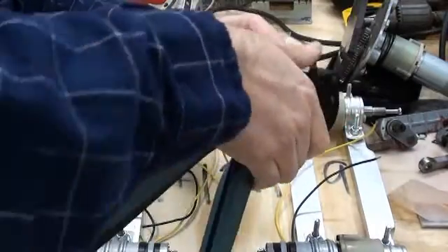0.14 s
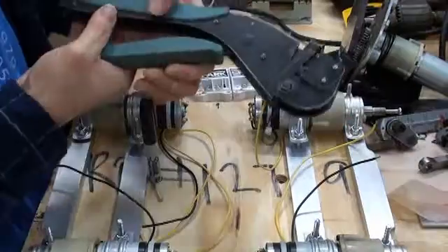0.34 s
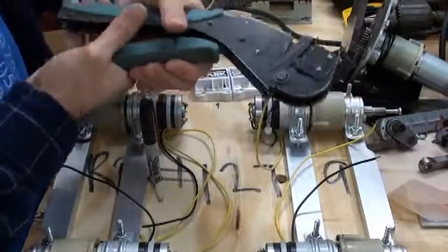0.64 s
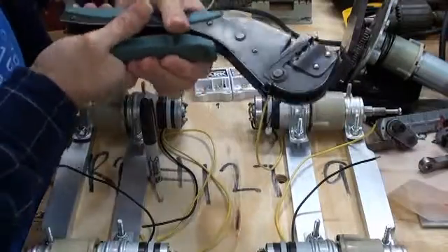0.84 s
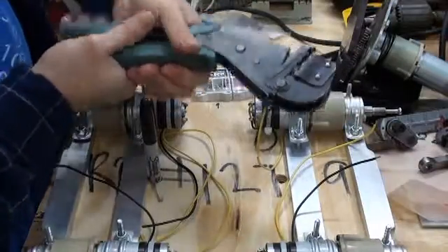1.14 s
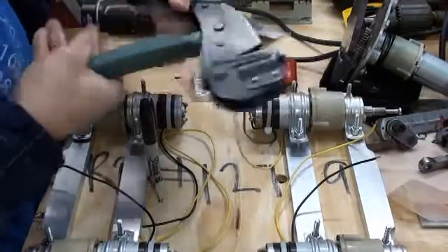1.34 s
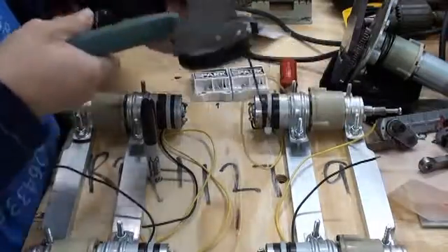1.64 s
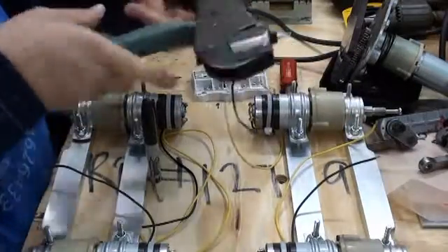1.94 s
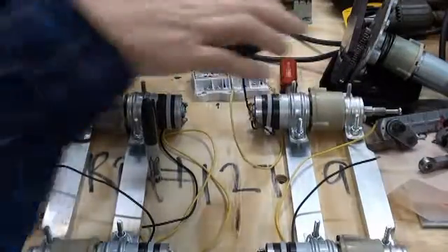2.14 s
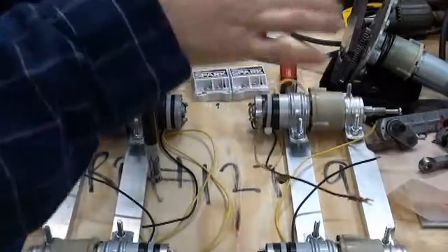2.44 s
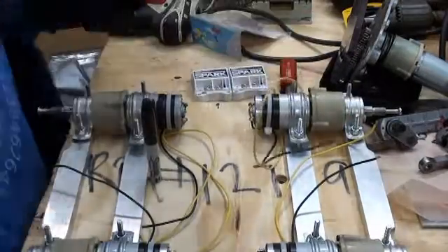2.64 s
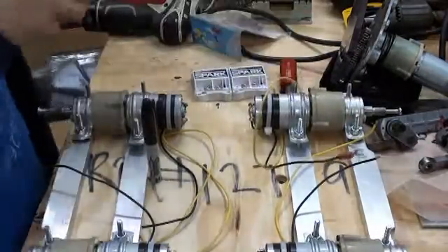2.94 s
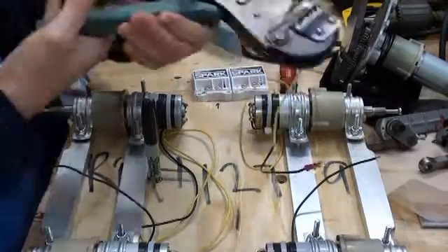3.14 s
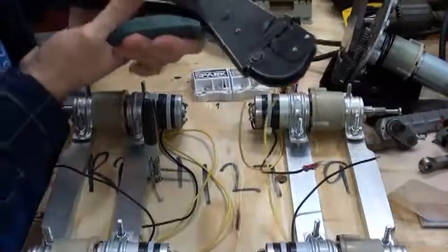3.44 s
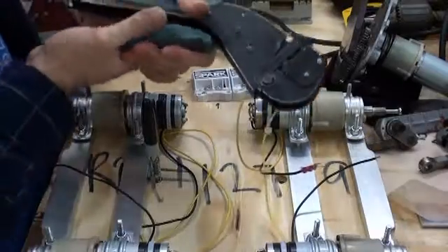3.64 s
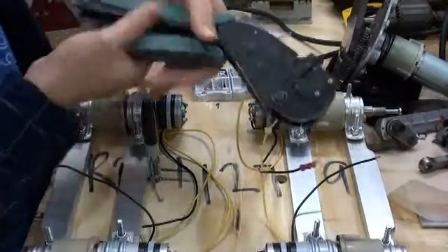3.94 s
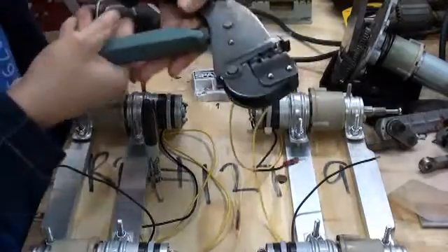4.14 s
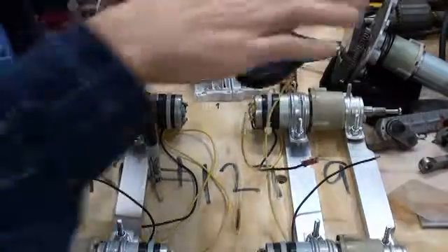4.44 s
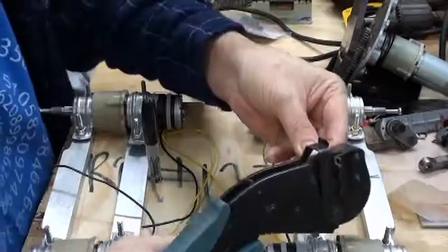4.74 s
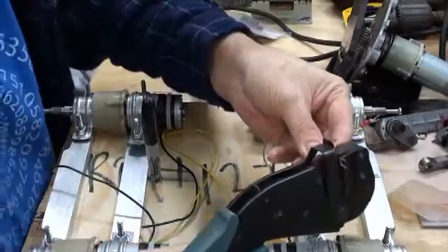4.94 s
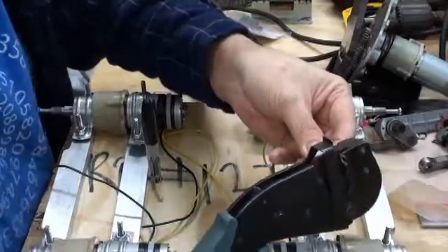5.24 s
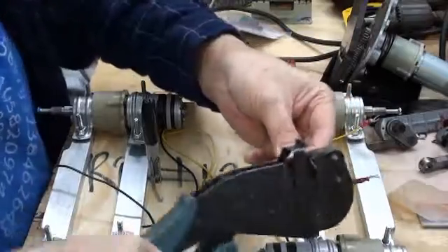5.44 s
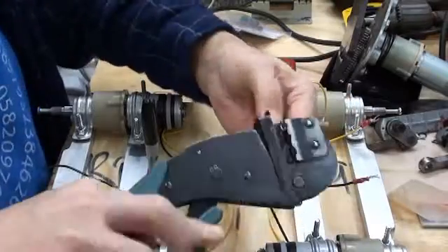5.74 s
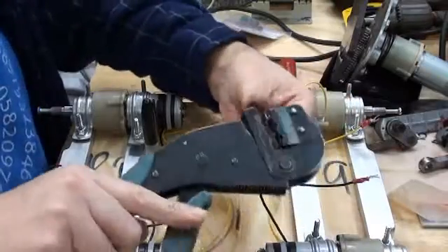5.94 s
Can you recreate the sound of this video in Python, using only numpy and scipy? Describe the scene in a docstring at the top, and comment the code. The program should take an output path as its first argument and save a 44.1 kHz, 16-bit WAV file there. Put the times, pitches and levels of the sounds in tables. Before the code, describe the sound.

A steel ratcheting crimping tool is handled over a wooden workbench, ticking and clacking in short, irregular clusters. Loose metal parts clink and rattle, with a few light knocks on the wood. More ratchet clicks follow, then a loud rattle and several hard knocks on the bench near the end. The sounds are close, in a small workshop, over soft sleeve rustle, a low rumble and faint hum.

```python
"""A ratcheting crimping tool, worked by hand over a wooden bench in a workshop.
The pawl ticks over steel teeth; the jaws clack and ring. Knocks and scuffs excite the bench top,
and loose parts rattle. Sleeves rustle over a low rumble, a far engine and mains hum.
The level dips briefly twice; a short high pip sounds as it returns the second time."""
import sys
import numpy as np
from scipy import signal
from scipy.fft import rfft, irfft
from scipy.io import wavfile
from scipy.ndimage import uniform_filter1d

SR = 44100
rng = np.random.default_rng(int(sys.argv[2]) if len(sys.argv) > 2 else 0)


def transcribe(signal):
    """Save signal, clipped to [-1, 1], as a 16-bit WAV file at the path in sys.argv[1]."""
    frames = np.atleast_2d(signal).T
    limited = np.clip(frames, -1, 1)
    pcm = np.round(limited * 32767).astype(np.int16)
    wavfile.write(sys.argv[1], SR, pcm)


N = 269342
T = np.arange(N) / SR

# Steel modes: pitch_hz, gain_db, t60_s
STEEL_MODES = [(1530, 2.5, 0.039), (3137, 6, 0.02), (3400, 5, 0.024), (4560, 6.5, 0.027),
               (5140, 8.5, 0.022), (6260, 10.5, 0.017), (7100, 11, 0.011), (7740, 11, 0.014),
               (8870, 3, 0.022)]
# Pawl drops: start_s, level_db, ping_hz
PAWL_TICKS = [(0.96, -25, 3206), (1.0799, -31.5, 5360), (1.1176, -27.5, 6580), (3.8118, -24.5, 3370),
              (3.915, -27, 4440), (3.9475, -22.5, 4370), (4.931, -18, 3030), (5.008, -20.5, 6500),
              (5.1602, -26, 3040), (5.2077, -21, 6600)]
# Ratchet releases: start_s, level_db, body_db, edge_db
RELEASE_CLACKS = [(1.194, -14, -1.5, -1.5), (4.014, -14, -1, -5.5)]
# Clinks and one pip: start_s, level_db, body_db, edge_db, room_db, ping_hz
# The row at 3.249 s is the short high pip as the sound returns after the second level dip.
CLINKS_AND_PIP = [(0.2188, -35, -28, -4.5, -4.5, 3020), (1.4141, -33, -9.5, 2, 4, 3960),
                  (1.493, -24.5, -30, 2, -1, 3470), (1.5627, -15, -16.5, 1, -11, 5300),
                  (1.565, -25.5, -28, 9, 6.5, 7930), (1.579, -26, -11, -3, -21, 7700),
                  (1.6029, -21, -17, -3, 0, 7950), (1.7833, -21, -22, -9, -4, 4380),
                  (1.815, -19, -16, 6, -4.5, 7800), (1.858, -27, -7, -12, -2.5, 4500),
                  (2.4455, -33.5, -10, 1, 2, 5200), (2.4577, -30, -28, 4, -10, 5260),
                  (2.7306, -25, -13, 5, -4, 5110), (2.9595, -28.5, -23, -0.5, -0.5, 7280),
                  (2.9663, -25.5, -18, 5, -4, 7200), (3.046, -40, -6, 8, 5, 6600),
                  (3.1881, -31.5, -30, 14, -4, 8850), (3.2028, -37.5, -8, 17, -7, 8500),
                  (3.232, -39.5, -15, 19.5, -28, 9100), (3.249, -43, -20, 1, -19, 7200),
                  (4.159, -27.5, -16, -10, -6.5, 4750), (4.1908, -35.5, -27, -2, -4, 4000),
                  (4.211, -37, -20, 3.5, 0.5, 7000), (4.2698, -25.5, -22, -4.5, -3, 4560),
                  (4.914, -40.5, -17, -3, 2, 5260), (5.32, -28, 6, -8, 8, 6360),
                  (5.66, -34.5, -28, -0.5, -12, 7680)]


def crimping_tool():
    """Each tick is a three-band crack plus a ping. Returns direct sound, room feed."""
    cracks, rings = np.zeros((2, 3, N)), np.zeros((2, N))
    t = np.arange(4096) / SR
    snap_t60_s, clink_t60_s = .0075, .015
    pawl_body_db, pawl_edge_db, pawl_room_db = -25, 7.5, -6.5
    release_room_db, release_ping_hz = -3.5, 1430
    ticks = [(start_s, db, pawl_body_db, pawl_edge_db, pawl_room_db, ping_hz, snap_t60_s)
             for start_s, db, ping_hz in PAWL_TICKS]
    ticks += [(*row, release_room_db, release_ping_hz, snap_t60_s) for row in RELEASE_CLACKS]
    ticks += [(*row, clink_t60_s) for row in CLINKS_AND_PIP]
    for start_s, db, body_db, edge_db, room_db, ping_hz, t60_s in ticks:
        attack = 1 - np.exp(-t / (.1 * t60_s))
        crack = attack * 10 ** (-3 * t / t60_s) * rng.standard_normal(len(t))
        ping = steel_ping(t, body_db, edge_db, ping_hz)
        impulse = np.array([np.sqrt(np.sum(crack ** 2))])  # same energy, for the room
        for path, (path_db, pulse) in enumerate(((0, crack), (room_db, impulse))):
            add(rings[path], start_s, undb(db + path_db) * ping)
            for register, register_db in enumerate((body_db, 0, edge_db)):
                add(cracks[path, register], start_s, undb(db + register_db + path_db) * pulse)
    body = undb(23.5) * band(band(cracks[:, 0], 1380, 2500), 1300, 3000)
    middle = undb(17) * band(band(cracks[:, 1], 3100, 6800), 3000, 9000)
    edge = undb(13) * band(cracks[:, 2], 6200, 11600)
    return body + middle + edge + undb([[-14], [-21]]) * rings


def steel_ping(t, body_db, edge_db, ping_hz):
    """Gripped steel damps fast. Contact point varies the mode levels; grip shifts their pitch."""
    mode_hz, mode_db, t60_s = np.transpose(STEEL_MODES)[:, :, None]
    share, shift = rng.standard_normal((2, len(STEEL_MODES), 1))
    register_db = np.interp(mode_hz, [1500, 3000, 5500, 7000], [body_db, 0, 0, edge_db])
    distance_hz = np.abs(mode_hz - ping_hz)
    nearest = distance_hz == distance_hz.min()
    pitch_hz = np.where(nearest, ping_hz, mode_hz * (1 + .02 * shift))
    level_db = mode_db + register_db + 7.5 * nearest + 3 * share
    modes = undb(level_db - 60 * t / t60_s) * np.sin(2 * np.pi * pitch_hz * t)
    attack = 1 - np.exp(-t / .0007)
    return attack * modes.sum(axis=0)


# Bench-top modes: pitch_hz, gain_db, t60_s
BENCH_MODES = [(234, -9, 0.28), (318, -15.5, 0.11), (275.6, -11.5, 0.18), (358.7, -3, 0.14),
               (418, 4, 0.035), (506, 2.5, 0.065), (606, 7, 0.042), (661, 1.5, 0.059), (719, 5.5, 0.03),
               (1025, 13, 0.014), (2250, -5.5, 0.037)]
# Knocks: start_s, level_db, contact_ms, ring_hz
BENCH_KNOCKS = [(0.003, -20.5, 2.7, 245), (0.265, -32.5, 0.11, 2250), (0.298, -22.5, 4.8, 234),
                (1.193, -31, 0.91, 402), (1.8161, -32.5, 1.04, 397), (1.831, -22.5, 2.27, 224),
                (1.88, -25, 2.5, 393), (1.946, -33.5, 1.2, 600), (1.981, -30.5, 2, 704),
                (4.013, -35, 0.57, 503), (4.2114, -25, 1.02, 230), (4.222, -35.5, 0.57, 740),
                (5.3082, -11.5, 1.08, 500), (5.333, -6.5, 1.7, 278), (5.348, -18.5, 1.05, 660),
                (5.38, -15, 1.17, 353), (5.555, -19, 2.65, 310), (5.606, -2, 2.19, 308),
                (5.631, -23, 0.89, 360), (5.661, -21, 2.9, 227)]


def bench_knocks():
    """A short push rings the board; longer contact is duller. The small board radiates no deep bass."""
    board = np.zeros(N)
    lag_s = .001566
    for start_s, db, contact_ms, ring_hz in BENCH_KNOCKS:
        pulse = np.hanning(max(int(contact_ms * SR / 1000), 3) + 2)
        push = np.pad(-undb(db) * pulse / pulse.sum(), (0, SR // 4))
        for hz, mode_db, t60_s in BENCH_MODES:
            share, shift = rng.standard_normal(2)  # contact point and load vary
            lift_db = 10.7 * np.exp(-(np.log2(hz / ring_hz) / .11) ** 2)
            mode = ring(push, hz * (1 + .017 * shift), t60_s)
            add(board, start_s + lag_s, undb(mode_db + 2 * share + lift_db) * mode)
    return undb(-9) * band(board, 200, 3000)


# Scuffs: peak_s, level_db, rise_s, t60_s
BENCH_SCUFFS = [(0.002, -33, 0.0022, 0.34), (1.85, -48.5, 0.065, 0.39), (4.89, -43.5, 0.032, 0.47),
                (5.33, -25, 0.023, 0.32)]


def bench_scuffs():
    """Dragged or rocking objects drive the board's modes with a rough force."""
    force = rng.standard_normal(N) * undb(5 * walk(120))
    drag = unit(sum(undb(db) * ring(force, hz, t60_s) for hz, db, t60_s in BENCH_MODES))
    return drag * sum(burst(*row) for row in BENCH_SCUFFS)


# Jolt: start_s, level_db, pitch_hz, t60_s
BENCH_JOLT = (5.318, -33, 68, .25)


def bench_thump():
    """The whole bench jolts in one low, decaying mode."""
    start_s, db, hz, t60_s = BENCH_JOLT
    age_s = np.maximum(T - start_s, 0)
    return undb(db - 60 * age_s / t60_s) * np.sin(2 * np.pi * hz * age_s)


# Rattles: peak_s, level_db, rise_s, t60_s, bright_share, ring_share, ring_hz
RATTLES = [(0.002, -31, 0.0081, 0.11, 0.17, 0, 3100), (1.43, -42.5, 0.092, 0.051, 0.72, 0.1, 4370),
           (1.571, -33, 0.022, 0.46, 1, 0.94, 7340), (1.572, -31, 0.01, 0.29, 0.92, 0.6, 3450),
           (1.83, -35.5, 0.068, 0.66, 0.72, 0, 5230), (2.735, -31, 0.02, 0.11, 0.95, 0.58, 5350),
           (3.2, -39.5, 0.059, 0.12, 1, 0.2, 8400), (5.355, -12.5, 0.045, 0.1, 0.53, 0.08, 7060)]


def loose_parts():
    """Bursts of dense, uneven contacts. Ungripped steel rings longer."""
    t60_ratio = 1.8
    grains = rng.standard_normal(N) * undb(4 * walk(340) + 1.2 * walk(60))
    dull, bright = unit(band(grains, 780, 4200)), unit(band(grains, 1900, 7720))
    mode_hz, mode_db, _ = np.transpose(STEEL_MODES[1:])
    modes = np.array([ring(grains, hz, t60_ratio * t60_s) for hz, _, t60_s in STEEL_MODES[1:]])
    out = np.zeros(N)
    for peak_s, db, rise_s, t60_s, bright_share, ring_share, ring_hz in RATTLES:
        lift_db = 12 * np.exp(-(np.log2(mode_hz / ring_hz) / .1) ** 2)
        ringing = unit(undb(mode_db + lift_db) @ modes)
        treble = (1 - ring_share) * bright + ring_share * ringing
        out += burst(peak_s, db, rise_s, t60_s) * ((1 - bright_share) * dull + bright_share * treble)
    return out


# Hand and sleeve activity: time_s, level_db
SLEEVE_LEVELS = [(0, -50), (.3, -53.5), (.55, -49.5), (.9, -55), (1.35, -57.5), (2, -51.5), (2.6, -49),
                 (2.9, -54.5), (3.25, -48), (3.45, -43), (3.75, -54), (4.35, -50), (4.56, -48.5),
                 (4.62, -56), (4.9, -62), (5.55, -47), (5.8, -45.5), (6.11, -49)]
# Rustle spectrum: freq_hz, density_db
SLEEVE_SPECTRUM = [(2500, -1), (3500, -1), (5000, 2.5), (7500, 2.5), (10000, -6), (13000, -14)]


def sleeves():
    """Cloth rustles as the hands move. Returns the rustle and its level contour in dB."""
    level_db = np.interp(T, *np.transpose(SLEEVE_LEVELS))
    return undb(level_db + 1.6 * walk(25)) * coloured(SLEEVE_SPECTRUM), level_db


# Scrape contour: time_s, level_db
SCRAPE_LEVELS = [(3.1, -61.5), (3.26, -48.5), (3.6, -51), (3.85, -66), (4.5, -53), (4.65, -90),
                 (5.5, -49.5), (5.75, -47.5), (6.11, -50)]
# Scrape spectrum: freq_hz, density_db
SCRAPE_SPECTRUM = [(1300, -12), (1700, 3), (2300, -2.5), (2620, 6), (2900, -2.5)]


def cloth_scrape():
    """Cloth rubs on the bench: thin, uneven noise."""
    level_db = np.interp(T, *np.transpose(SCRAPE_LEVELS))
    return undb(level_db + 1.5 * walk(15)) * coloured(SCRAPE_SPECTRUM)


# Broad noise, rumble and deep rumble spectra: freq_hz, density_db
BROAD_SPECTRUM = [(150, 5.5), (250, 2.5), (600, 3), (1000, 0), (2000, -3.5), (4000, -19), (8000, -15),
                  (13000, -20.5)]
RUMBLE_SPECTRUM = [(70, -32), (115, 5.5), (170, 3.5), (250, -19)]
DEEP_SPECTRUM = [(30, -6), (56, -1), (72, -6), (110, 5)]


def background_noise(sleeve_db):
    """Broad noise and rumble swell with the sleeves over a steady deep rumble. Returns mid, side."""
    swell_db = .26 * (sleeve_db + 50)
    broad_gain = undb(-48 + swell_db + 1.2 * walk(14))
    rumble = undb(-55.5 + swell_db) * coloured(RUMBLE_SPECTRUM)
    deep = undb(-58) * coloured(DEEP_SPECTRUM)
    return broad_gain * coloured(BROAD_SPECTRUM) + rumble + deep, broad_gain * coloured(BROAD_SPECTRUM)


# Engine drone: time_s, pitch_hz, low_partial_db, middle_partial_db, high_partial_db
ENGINE_TRACK = [(0.35, 68, -46, -68, -68), (0.5, 67.94, -59, -55, -55), (0.87, 61.2, -60, -69, -56),
                (1.45, 57.4, -63, -66, -50.5), (1.65, 53.3, -59, -66, -58), (1.99, 54.9, -47, -62, -62),
                (2.42, 57.07, -59, -91, -51), (2.82, 63.8, -53, -50, -62.5), (3.24, 65.8, -52, -50.5, -63)]


def far_engine():
    """A distant engine drones in three gliding partials, each wavering in level."""
    time_s, pitch_hz, *partials_db = np.transpose(ENGINE_TRACK)
    phase = 2 * np.pi * np.cumsum(np.interp(T, time_s, pitch_hz)) / SR
    fade = np.clip(np.minimum(T - time_s[0], time_s[-1] - T) / .02, 0, 1)
    out = np.zeros(N)
    for ratio, db in zip((1, 1.5, 2.5), partials_db):
        out += undb(np.interp(T, time_s, db) + 2.9 * walk(8.74)) * np.sin(ratio * phase)
    return np.sqrt(2) * fade * out


def mains_hum(pitch_hz=117, rms_db=-58.5):
    """One sine of steady pitch and wavering level."""
    return np.sqrt(2) * undb(rms_db + 2.7 * walk(6.06)) * np.sin(2 * np.pi * pitch_hz * T)


def room(x, delay_s=.008, t60_s=.33):
    """Wall reflections: a gap, then a diffuse tail. Treble dies sooner."""
    t = np.arange(int(.5 * SR)) / SR
    low = band(rng.standard_normal(len(t)), 120, 3500) * 10 ** (-3 * t / t60_s)
    high = band(rng.standard_normal(len(t)), 4100, 9900) * 10 ** (-3 * t / (.84 * t60_s))
    tail = np.concatenate([np.zeros(int(delay_s * SR)), low + .92 * high])
    return signal.fftconvolve(x, tail / np.sqrt(np.sum(tail ** 2)))[:N]


def undb(db):
    return 10 ** (np.asarray(db) / 20)


def unit(x):
    return x / np.sqrt(np.mean(x ** 2))


def band(x, lo_hz, hi_hz):
    return signal.sosfilt(signal.butter(3, [lo_hz, hi_hz], "bandpass", fs=SR, output="sos"), x)


def add(out, start_s, x):
    i = int(start_s * SR)
    out[i:i + len(x)] += x[:N - i]


def ring(x, hz, t60_s):
    """One decaying mode driven by x."""
    radius, angle = np.exp(-np.log(1000) / (t60_s * SR)), 2 * np.pi * hz / SR
    return signal.lfilter([np.sin(angle)], [1, -2 * radius * np.cos(angle), radius ** 2], x)


def walk(rate_hz):
    """Slewed random steps, spread near 1."""
    hold = int(SR / rate_hz)
    return uniform_filter1d(np.repeat(rng.standard_normal(N // hold + 1), hold), hold)[:N]


def coloured(spectrum):
    """Steady shaped noise, rms 1."""
    hz, db = np.transpose(spectrum)
    bin_hz = np.maximum(np.fft.rfftfreq(N, 1 / SR), 1)
    gain = undb(np.interp(np.log(bin_hz), np.log(hz), db, left=-60, right=-60))
    return unit(irfft(rfft(rng.standard_normal(N)) * gain, N))


def burst(peak_s, level_db, rise_s, t60_s, climb_db=12):
    """Envelope: climbs until peak_s, then decays."""
    shape_db = np.where(T < peak_s, climb_db / rise_s, -60 / t60_s) * (T - peak_s)
    return undb(level_db + shape_db) * (T > peak_s - rise_s)


def scene():
    """Centred sources; only reflections and broad noise differ between left and right."""
    tool, tool_feed = crimping_tool()
    bench = bench_knocks() + bench_scuffs() + bench_thump()
    rattles = loose_parts()
    room_feed = undb(-4.5) * (tool_feed + undb(-3.5) * bench + rattles)
    mid = tool + bench + rattles + room(room_feed)
    rustle, sleeve_db = sleeves()
    mid += rustle + cloth_scrape()
    noise_mid, noise_side = background_noise(sleeve_db)
    mid += noise_mid + mains_hum() + far_engine()
    diffuse = undb(2.5) * room(room_feed) + noise_side
    brightened = signal.lfilter([3, -2.2], 1, diffuse)
    side = undb(-13) * band(band(brightened, 292, 3100), 292, 3100)
    return np.array([mid + side, mid - side])


# Level dips: start_s, end_s, fade_s
LEVEL_DIPS = [(.341, .348, .006), (3.236, 3.249, .002)]


def record(dry, dip_gain=.12, cutoff_hz=12500):
    """Two brief dips, soft clipping, low-pass."""
    gain = np.ones(N)
    for start_s, end_s, fade_s in LEVEL_DIPS:
        gain *= np.clip(np.maximum(start_s - T, T - end_s) / fade_s, dip_gain, 1)
    rounded = np.tanh(.9 * dry * gain) / .9
    return signal.sosfilt(signal.ellip(10, .2, 70, cutoff_hz, fs=SR, output="sos"), rounded)


dry = scene()
out = record(dry)
transcribe(out)
```